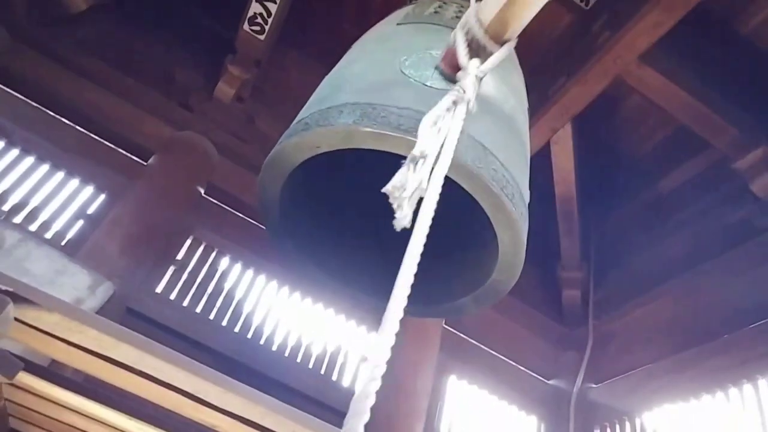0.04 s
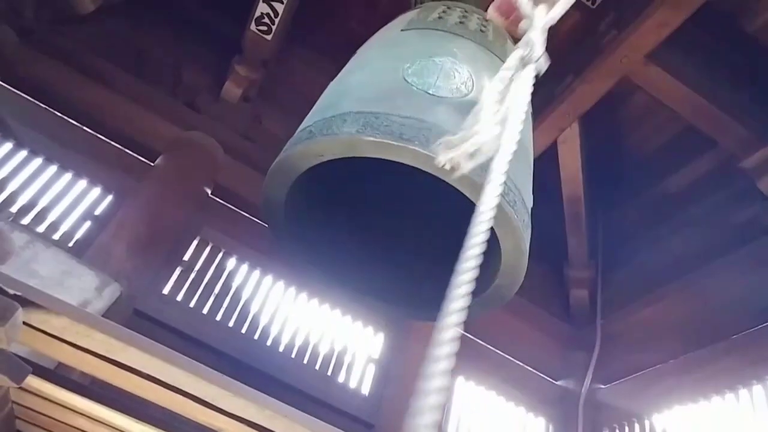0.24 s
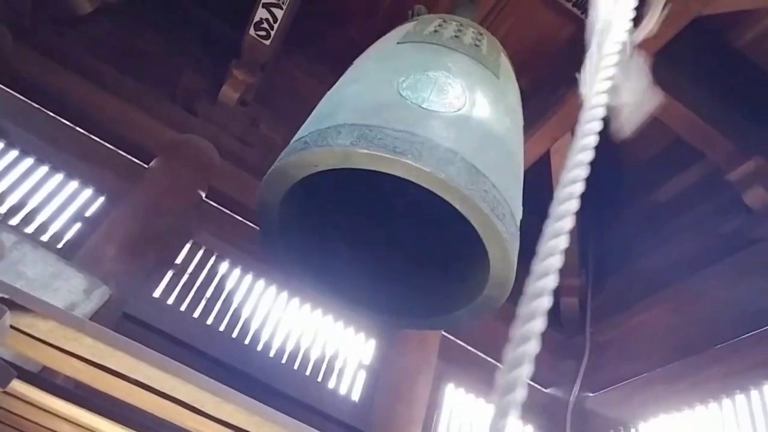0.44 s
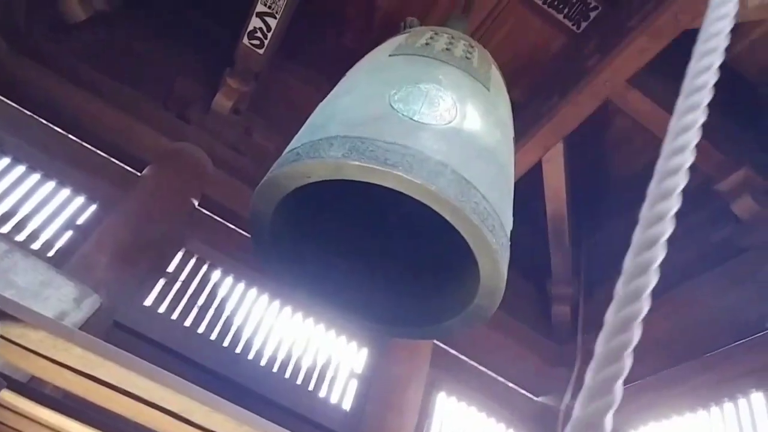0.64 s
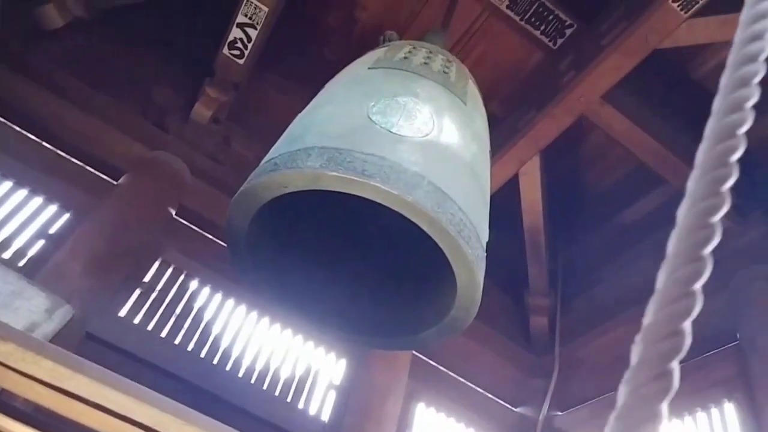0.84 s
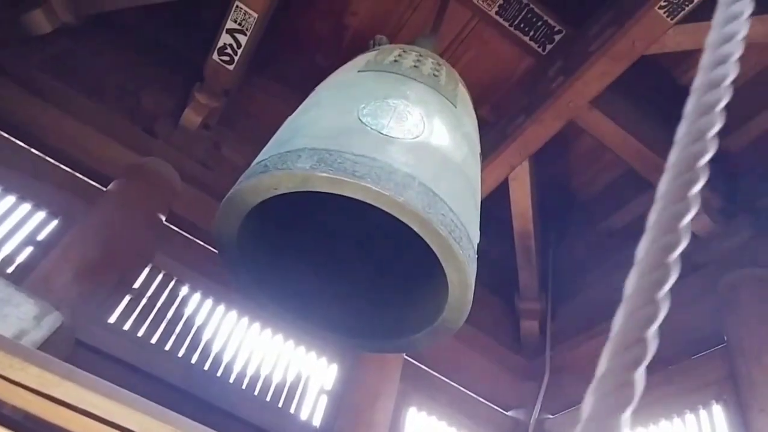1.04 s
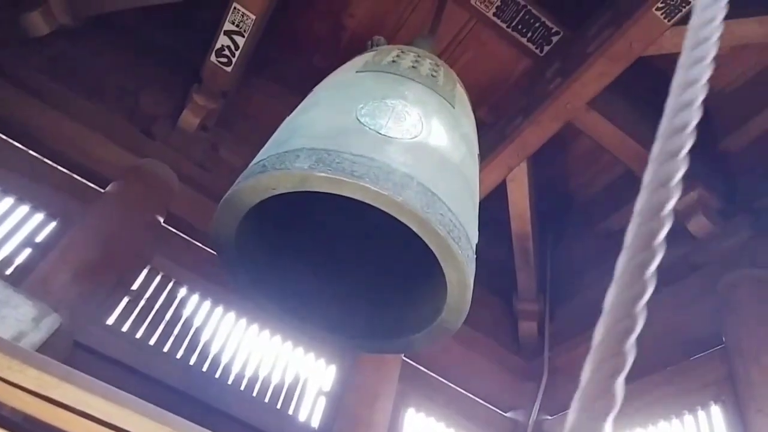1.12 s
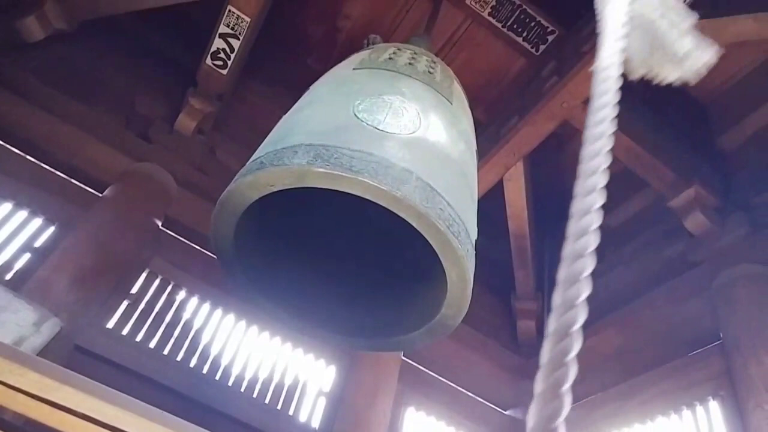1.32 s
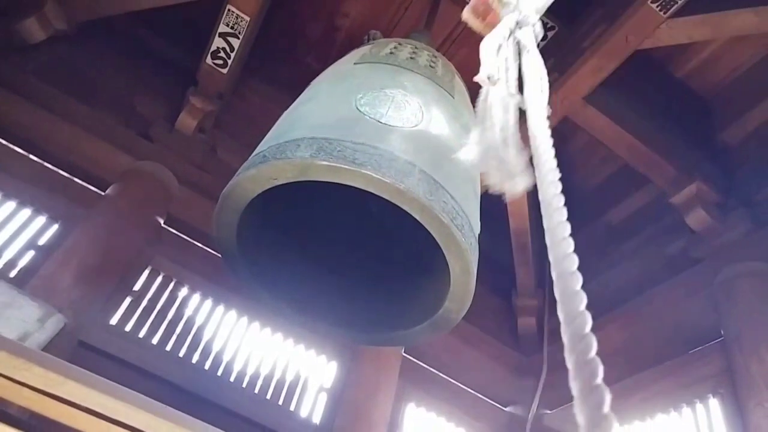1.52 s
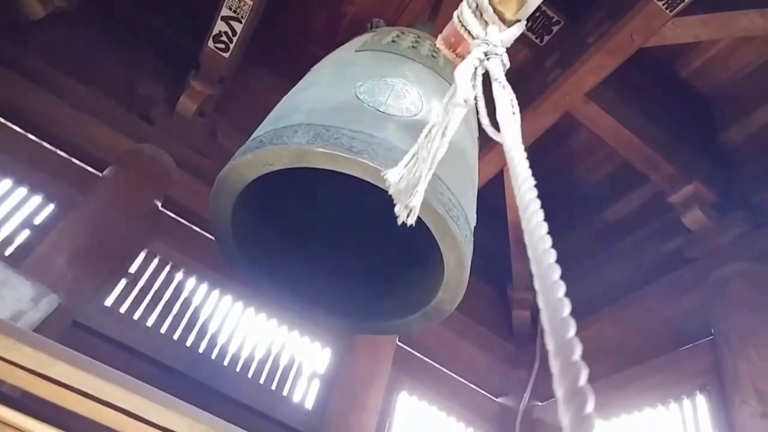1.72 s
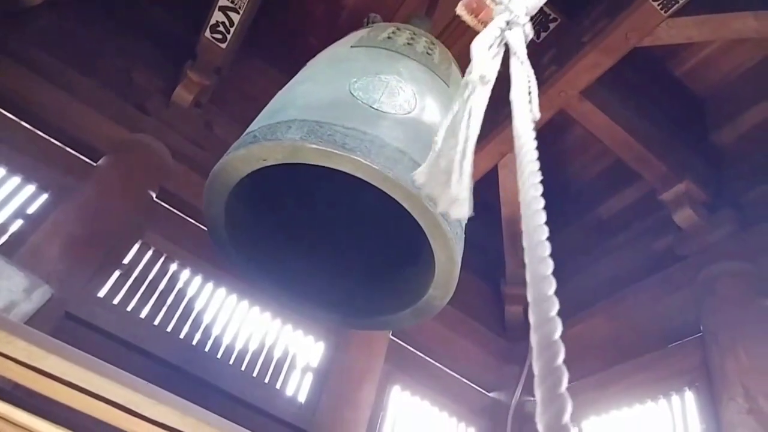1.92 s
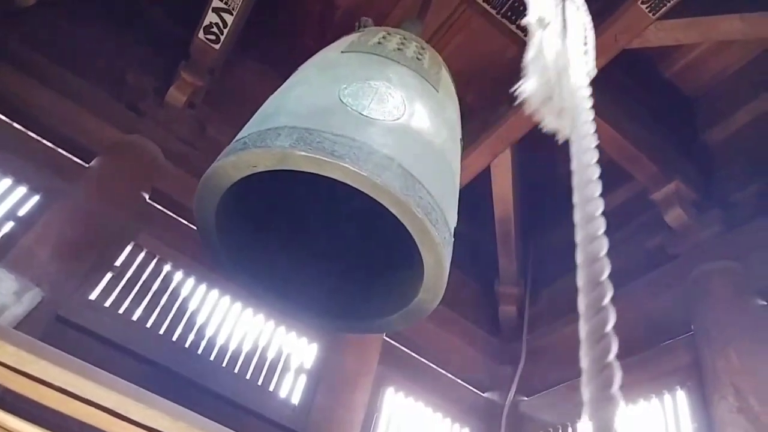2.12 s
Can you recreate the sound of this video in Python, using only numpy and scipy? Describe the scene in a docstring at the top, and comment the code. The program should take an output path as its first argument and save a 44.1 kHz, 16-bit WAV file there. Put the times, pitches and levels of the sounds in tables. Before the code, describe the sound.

A large temple bell clangs once as a wooden beam hits it near the microphone, its hangers rattling. The tone settles into a low, pulsing hum beneath a wooden roof, with faint rope rustles before and after.

```python
"""A rope rustles faintly over a low rumble, then a wooden beam strikes a big bronze temple bell once.
The beam cracks and thuds close by, under a timber roof, and its hangers rattle as it bounces back.
The bell's low tones come in close pairs, so they throb, differently at the left and right microphones.
A limiter turns the loud blow down and then lets go, so the hum seems to swell.
The rope rustles again and the hangers creak as the beam swings on."""
import sys
import numpy as np
from scipy import signal
from scipy.fft import rfft, irfft, next_fast_len
from scipy.io import wavfile
from scipy.ndimage import uniform_filter1d, minimum_filter1d

SR = 44100
rng = np.random.default_rng(int(sys.argv[2]) if len(sys.argv) > 2 else 0)


def output_pcm(signal):
    """Save a mono or channel-first signal as 16-bit PCM at the path in sys.argv[1].

    Samples are clipped to [-1, 1] before scaling.
    """
    pcm = np.clip(np.atleast_2d(signal).T, -1, 1) * 32767
    wavfile.write(sys.argv[1], SR, np.round(pcm).astype(np.int16))


N = 94815

# How alike the two sides of a noise are. Each row: frequency in Hz, likeness (1 means the same).
STEREO_LIKENESS = [(30, 0.14), (80, 0.92), (250, 1), (600, 0.3), (2000, 0.74), (10000, .1)]
# The tone colour of each noise. Each row: frequency in Hz, relative level in dB.
RUMBLE_COLOUR = [(20, -22), (45, -14.5), (70, -5.5), (110, -7.5), (170, -11.5), (400, -20), (1000, -24.5),
                 (2500, -40.5), (8000, -47), (10000, -58), (16000, -67.5)]
ROPE_COLOUR = [(300, -6), (1500, -0.5), (2600, 0), (5000, -5), (8000, 0), (9500, -23.5), (11000, -19.5),
               (13500, -14), (16000, -27.5)]
RATTLE_COLOUR = [(500, -2.5), (1500, 1.5), (3300, -1.5), (5500, -8), (8500, -16), (9300, -28),
                 (16000, -46.5)]
CRACK_COLOUR = [(100, -4.5), (600, 6), (1400, -2.5), (2200, -20), (3000, -8.5), (5000, -16), (8200, -18),
                (9300, -29.5), (11000, -49), (16000, -46)]
THUD_COLOUR = [(25, -25), (60, -15), (90, -5), (150, -10), (260, 2), (450, -7.5), (900, -1), (1400, -5),
               (2000, -9.5), (3200, -16.5), (5500, -15.5), (7000, -19.5), (8850, -18.5), (9200, -47.5),
               (11000, -54), (13500, -40.5), (16000, -62)]
# Short swells of noise. Each row: middle in seconds, length in seconds, level in dB.
ROPE_RUSTLES = [(0.073, .1, -63), (.215, 0.12, -60.5), (1.352, 0.049, -66.5), (1.779, 0.13, -54.5),
                (2.035, 0.11, -67), (2.14, 0.091, -62.5)]
HANGER_RATTLES = [(.411, 0.02, -28), (.526, 0.016, -43), (.57, .08, -46.5)]
HANGER_CREAKS = [(1.92, .06, -77), (2.02, 0.11, -67), (2.13, .08, -71.5)]
# Rope fibres slipping. Each row: start in seconds, level in dB.
FIBRE_SLIPS = [(1.722, -53.5), (1.761, -50.5), (1.789, -46), (1.812, -47)]
# The resonances of a creak. Each row: centre in Hz, width in Hz, relative level in dB.
CREAK_BANDS = [(1550, 35, -1.5), (1984, 110, 1.5), (2730, 150, -3), (3400, 150, -8.5)]
# The resonances of beam and frame. Each row: centre in Hz, width in Hz, level in dB, fade time in
# seconds. A fade time (t60) is how long a sound takes to drop by 60 dB.
KNOCK_BANDS = [(89.4, 22, -25.5, 0.98), (436, 34, -10, 0.33), (477.6, 14, -24, 1), (670, 150, 0.5, 0.15),
               (1050, 300, 1.5, 0.033), (2268, 96, -28, 0.29), (4660, 280, -19, 0.074),
               (5470, 1100, -39.5, 0.77), (7800, 430, -27, 0.39)]
# How long the thud lasts. Each row: frequency in Hz, fade time in seconds.
THUD_FADES = [(80, 0.98), (250, 0.73), (500, 0.72), (1200, 0.81), (2500, .48), (5000, .42), (9000, 0.33),
              (14000, .3)]
# The bell's clang. Each row: pitch in Hz, relative level in dB, fade time in seconds, left over right
# in dB.
CLANG_TONES = [(853, -5, .8, 0), (859.4, -24.5, 5.3, 9), (1297.5, -16, 1.1, 4), (1455, -21, 1.2, 0),
               (1464.5, -17, 1.45, 2), (1489.3, -18, 1.1, 0), (1540, -28, 1.3, 4), (1668, -21, .95, -3),
               (1712, -21, .9, -3), (1733, -24, 1.1, 12), (1787, -20, .6, 1), (1840, -15, .7, 6),
               (1906, -19, .6, 7), (1992, -37, 1.7, 4), (2004, -39, 1.6, 0), (2049, -8, .42, -4),
               (2207, -35, 1.55, 2), (2256, -31, .95, -4), (2417, -29, .72, -1), (2643, -33, .85, 2),
               (2848, -28, .65, -4)]
# The bell's hum: tones with a slightly higher twin. Each row: pitch in Hz, gap to the twin in Hz,
# fade times of tone and twin in seconds, relative levels in dB (tone left, tone right, twin left,
# twin right), first lull in seconds after the blow (left, right), the left side's lead in radians.
HUM_PAIRS = [(248.01, 1.45, 8, 9.3, -8.5, -10.2, -8.7, -11, .339, .362, -.05),
             (600.05, 2.28, 3.2, 3.4, .8, -1.7, -8, 0, .276, .057, 1.41),
             (716.7, 9.12, 2.6, 5.2, -9.5, -3.8, -15, -15.3, .058, .071, -2.79),
             (836.3, 4.27, 1.7, 2.6, 1, -3.5, -18, -13, .155, .198, -.84),
             (1069.2, 9.41, 2.6, 2.9, -21.7, -25.3, -29.2, -20.3, .083, .056, .6),
             (1129.9, 4.37, 1.6, 1.5, -12.5, -8.5, -4.5, -7.8, .017, .099, 1.9),
             (1274.4, .65, 1.1, 1.28, -1.5, -3.3, -15, 0, .342, .062, 1.02),
             (1350.9, 4.36, 1.14, 1.5, 1.2, -11, -24, -28, .078, .18, .17)]

STRIKE_S = 0.2395
LEFT_RIGHT = np.array([[1], [-1]])  # adds on the left, subtracts on the right


def amp(db):
    """Turn decibels into a gain."""
    return 10 ** (np.asarray(db) / 20)


def sides(left, right):
    """One value for each stereo side."""
    return np.array([[left], [right]])


def along(points, hz):
    """Read between (Hz, value) points on a log frequency scale."""
    freqs, values = np.transpose(points)
    return np.interp(np.log(hz + 1), np.log(freqs + 1), values)


def since(start_s):
    """Seconds since a moment, zero before it."""
    return np.maximum(np.arange(N) / SR - start_s, 0)


def fade(t, t60, attack_s):
    """Rise quickly, then die away."""
    return amp(-60 * t / t60) * (1 - np.exp(-t / attack_s))


def swells(rows):
    """A smooth rise and fall for each row."""
    t = np.arange(N) / SR
    return sum(amp(db) * np.exp(-(2 * (t - middle) / length) ** 2) for middle, length, db in rows)


def grain(depth_db):
    """The fast, random flicker in level of things rubbing."""
    count = N // 128
    flicker = np.interp(np.arange(N), np.linspace(0, N, count), rng.standard_normal(count))
    return amp(depth_db * flicker)


def filtered(x, response):
    """Scale each frequency in x by response(hz)."""
    size = next_fast_len(N + SR // 2)
    return irfft(rfft(x, size) * response(np.fft.rfftfreq(size, 1 / SR)), size)[..., :N]


def noise(colour):
    """Stereo noise of a given colour, with an average (rms) level of 1."""
    def response(hz):
        spread = np.arccos(np.clip(along(STEREO_LIKENESS, hz), -1, 1)) / 2
        return amp(along(colour, hz)) * [np.cos(spread), np.sin(spread)]

    mid, side = filtered(rng.standard_normal((2, N)), response)
    pair = np.array([mid + side, mid - side])
    return pair / pair.std()


def resonance(centre_hz, width_hz):
    """Noise gathered around one pitch."""
    hz = np.geomspace(20, SR / 2, 3000)
    db = -20 * np.log10(1 + ((hz - centre_hz) / width_hz * 2) ** 2)
    return noise(np.transpose([hz, db]))


def rumble(start_db=-64.5, rise_db=14):
    """Low background noise in the bell house, louder once the beam has struck."""
    rise = 1 - np.exp(-since(STRIKE_S) / 0.1)
    return noise(RUMBLE_COLOUR) * amp(start_db + rise_db * rise)


def rope():
    """The pull rope rubs in short grainy strokes, with a few sharper slips."""
    slips = sum(amp(db) * fade(since(start), t60=0.04, attack_s=0.00092) for start, db in FIBRE_SLIPS)
    return noise(ROPE_COLOUR) * (swells(ROPE_RUSTLES) + slips) * grain(depth_db=2.5)


def frame():
    """The blow knocks beam and frame; the hangers rattle, then creak on the next swing."""
    t = since(STRIKE_S)
    knock = sum(amp(db) * resonance(hz, width) * fade(t, t60, attack_s=0.0035)
                for hz, width, db, t60 in KNOCK_BANDS)
    rattle = noise(RATTLE_COLOUR) * swells(HANGER_RATTLES) * grain(depth_db=0.5)
    creak = sum(amp(db) * resonance(hz, width) for hz, width, db in CREAK_BANDS)
    return knock + rattle + creak * swells(HANGER_CREAKS)


def beam(crack_db=7.5, thud_db=-6):
    """Wood cracks on bronze; the thud dies away among the roof timbers, treble first."""
    t = since(STRIKE_S)
    crack = noise(CRACK_COLOUR) * fade(t, t60=0.04, attack_s=0.00045)
    hz, times, bands = signal.stft(noise(THUD_COLOUR), SR, nperseg=512)
    dying = amp(-60 * np.maximum(times - STRIKE_S, 0) / along(THUD_FADES, hz)[:, None])
    thud = signal.istft(bands * dying, SR, nperseg=512)[1][:, :N]
    thud_rise = 1 - np.exp(-t / 0.0061)
    return amp(crack_db) * crack + amp(thud_db) * thud * thud_rise


def shimmer(count=48, lowest_hz=2100, level_db=-34.5, db_per_octave=-4.5):
    """Weak high tones of the bronze, softer and shorter as they go up."""
    t, out = since(STRIKE_S), np.zeros((2, N))
    for k, (offset, left_phase, right_phase) in enumerate(rng.random((count, 3))):
        octaves = 2 * (k + offset) / count
        hz = lowest_hz * 2 ** octaves
        tone = np.sin(2 * np.pi * (hz * t + sides(left_phase, right_phase)))
        envelope = fade(t, t60=0.45 * 0.27 ** octaves, attack_s=0.0029)
        out += amp(level_db + db_per_octave * octaves) * tone * envelope
    return out


def ring(t, t60, direct=0.35):
    """Part of a bell tone sounds at once; the rest builds up under the roof."""
    return direct * fade(t, t60, attack_s=0.0011) + (1 - direct) * fade(t, t60, attack_s=0.025)


def bell(gain_db=0.5):
    """Twin tones drift in and out of step, so the hum throbs; single tones add the clang."""
    t, out = since(STRIKE_S), np.zeros((2, N))
    for (hz, gap_hz, t60, twin_t60, left_db, right_db, twin_left_db, twin_right_db,
         lull_left, lull_right, lead) in HUM_PAIRS:
        phase = 2 * np.pi * (hz * t + rng.random()) + sides(lead, 0)
        drift = 2 * np.pi * gap_hz * (t - sides(lull_left, lull_right))
        out += amp(sides(left_db, right_db)) * np.sin(phase) * ring(t, t60)
        # Subtracted, so the twin works against the tone at each lull.
        out -= amp(sides(twin_left_db, twin_right_db)) * np.sin(phase + drift) * ring(t, twin_t60)
    for hz, db, t60, pan_db in CLANG_TONES:
        phase = 2 * np.pi * (hz * t + rng.random()) + sides(rng.choice([-1, 1]) * 1.73, 0)
        out += amp(db + LEFT_RIGHT * pan_db / 2) * np.sin(phase) * ring(t, t60)
    return amp(gain_db) * out


def scene():
    """All the sounds added together."""
    return bell() + shimmer() + beam() + frame() + rope() + rumble()


def record(dry, overload=5.5, look_ahead_s=0.0003, recover_db_per_s=109, link=0.16, top_hz=15500):
    """The input clips, a fast limiter holds the peaks down, and the highest treble is cut."""
    clipped = np.clip(dry, -overload, overload)
    needed_db = np.minimum(-20 * np.log10(np.abs(clipped) + 1e-9), 0)  # brings peaks down to 1
    window = 2 * int(look_ahead_s * SR) + 1
    held_db = minimum_filter1d(needed_db, window)
    # The gain drops at once and climbs back steadily.
    recovery_db = recover_db_per_s * np.arange(N) / SR
    gain_db = np.minimum.accumulate(held_db - recovery_db, axis=1) + recovery_db
    gain_db += link * (gain_db.min(0) - gain_db)  # each side partly follows the louder one
    limited = clipped * amp(uniform_filter1d(gain_db, window))
    return filtered(limited, lambda hz: hz < top_hz)


dry = scene()
out = record(dry)
output_pcm(out)
```